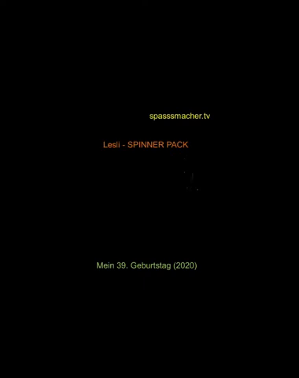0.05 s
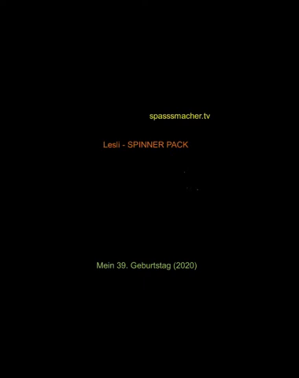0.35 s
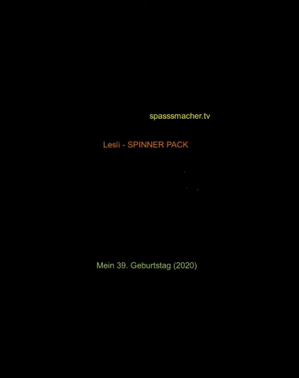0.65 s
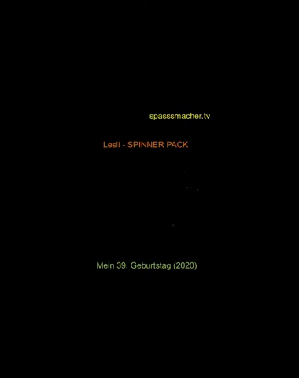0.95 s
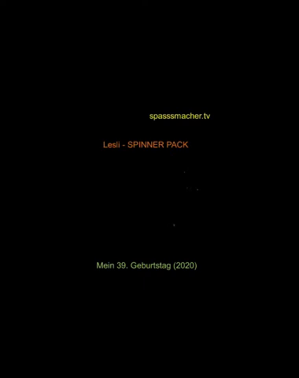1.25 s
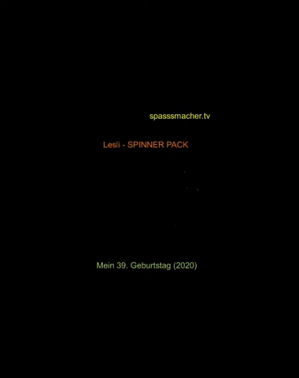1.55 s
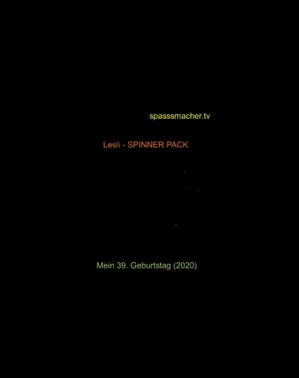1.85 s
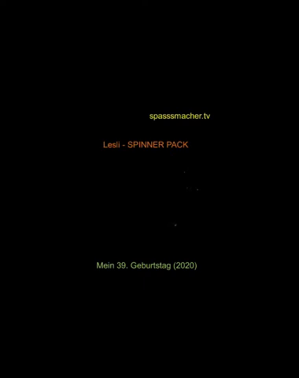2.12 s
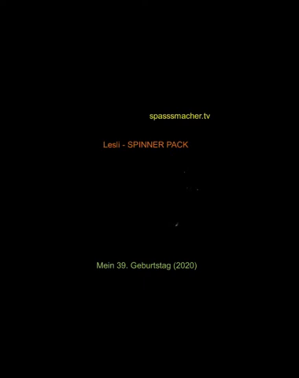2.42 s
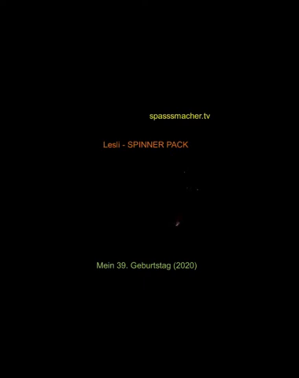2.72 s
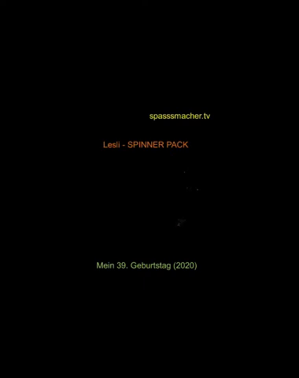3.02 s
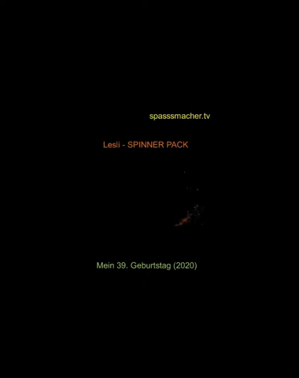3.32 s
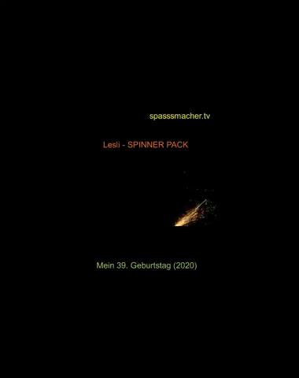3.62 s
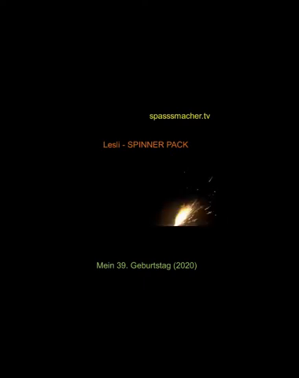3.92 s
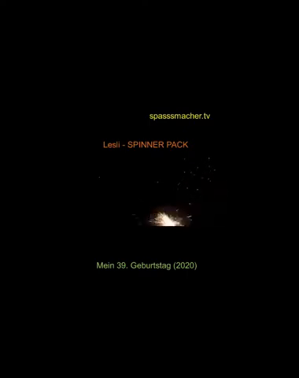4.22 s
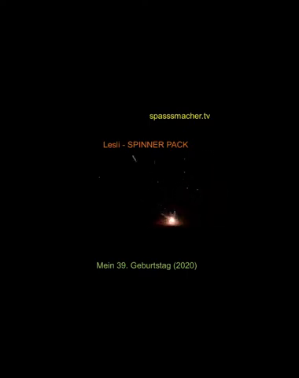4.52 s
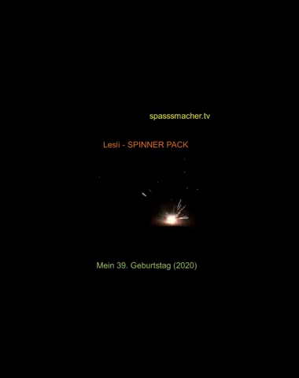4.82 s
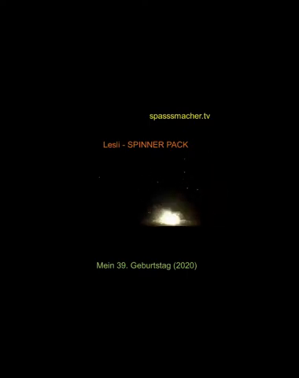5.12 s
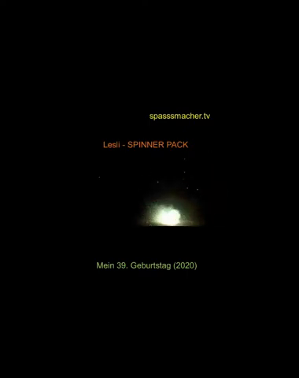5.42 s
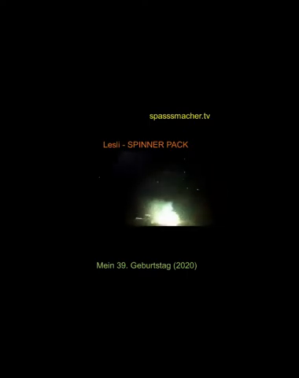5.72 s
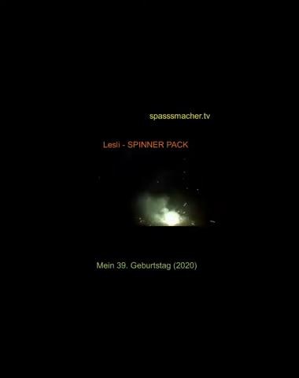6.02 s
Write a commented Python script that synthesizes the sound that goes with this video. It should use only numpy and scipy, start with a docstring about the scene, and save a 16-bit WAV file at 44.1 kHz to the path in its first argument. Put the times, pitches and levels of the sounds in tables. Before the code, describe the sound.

A fuse fizzes faintly in the quiet night air, with a brief spurt and a few ticks. The ground spinner firework then catches and builds to a loud, bright hiss with sharp snaps. A whirring tone rises as it spins, then falls while the case rattles on the pavement. The spin stops and the hiss carries on more softly, straight ahead of the microphone.

```python
"""On a pavement on a quiet night, a ground spinner firework is burning.
Its fuse fizzes and spurts, then the powder inside catches and shoots out a jet of hissing sparks.
The jet drives the case round, up to about 340 turns a second, so the hiss pulses and a whirring
tone glides with the spin. The case rattles on the ground, slows, stops and burns on."""
import sys
import numpy as np
from scipy import signal
from scipy.fft import rfft, irfft, next_fast_len
from scipy.io import wavfile
from scipy.ndimage import map_coordinates

SR = 44100
rng = np.random.default_rng(int(sys.argv[2]) if len(sys.argv) > 2 else 0)


def dump_mix(stems):
    """Bounce the given channels to the path in sys.argv[1] as a 16-bit WAV at rate SR."""
    frames = np.atleast_2d(stems).T  # one column per channel
    limited = np.clip(frames, -1, 1)  # hard clip at full scale
    pcm = np.round(limited * 32767).astype(np.int16)
    wavfile.write(sys.argv[1], SR, pcm)


N = 271774

# the rumble of the open air: (frequency [Hz], level [dB])
NIGHT_SPECTRUM = [(12, -25), (22, 4), (65, 1.5), (130, -3), (270, -6), (360, -7.5), (520, -12),
                  (880, -11.5), (1270, -15), (2200, -16), (3500, -18)]
# how alike that rumble is in the two ears: (frequency [Hz], likeness [0 to 1])
NIGHT_LIKENESS = [(40, 0.92), (180, 0.97), (550, 0.9), (1650, 0.92)]
# faint, dull swells in the background: (time [s], level [dB], half length [s])
SWELLS = [(.01, -53, 0.026), (.24, -55, 0.021), (0.664, -59.5, 0.061), (0.983, -60.5, 0.12),
          (1.296, -58.5, 0.095), (2.73, -56.5, 0.05)]
# the burning powder: (time [s], hiss [dB], roar relative to hiss [dB], fizz relative to hiss [dB])
POWDER_LEVELS = [(2.78, -46.5, -2.5, -14), (3.02, -33, -8, -9), (3.6, -23, -7.5, -8), (3.8, -19, -6.5, -5),
                 (4.0, -17.5, -5, -3), (4.35, -17, -10.5, 1), (4.7, -18.5, -8, -2), (4.95, -18, -7, -6),
                 (5.03, -16.5, -8, -14), (5.09, -13, -10, -9), (5.23, -15.5, -7.5, -16),
                 (5.28, -13.5, -7, -4.5), (5.52, -14.5, -8, -7.5), (5.77, -17.5, -6, -7),
                 (5.93, -26.5, 0.5, -12), (6.04, -24, -2.5, -11.5), (6.16, -28, 0.5, -7)]
# brief swells and dips in the hiss, including the pulses of the case's first and last slow turns:
# (time [s], half length [s], gain [dB])
HISS_SWELLS_AND_DIPS = [(.1, 0.034, 2.5), (.3, 0.033, -3.5), (.47, .03, -3), (.515, .015, 4.5),
                        (.635, 0.028, 5.5), (2.43, 0.037, 6.5), (2.54, 0.035, 3), (3.024, .02, 2),
                        (3.353, 0.038, 1), (3.683, 0.12, 1), (3.903, .017, 6.5), (3.929, 0.0082, -6),
                        (3.96, 0.013, 5), (3.985, 0.0069, 3), (4.781, .013, 4.5), (4.825, 0.016, 3),
                        (5.522, 0.018, 2.5), (5.655, .02, 2.5), (5.707, 0.013, 5), (5.737, .01, -3)]
# the tone colour of the sparks: (frequency [Hz], level [dB])
SPARK_SPECTRUM = [(1200, -35.5), (1900, -25), (2400, -14.5), (2800, -5.5), (3250, -7), (4100, -10.5),
                  (5200, -11), (6400, -8), (7000, -3.5), (7450, 0), (8100, -5.5), (9000, -11.5),
                  (9600, -2.5), (11500, -12), (15800, -21.5)]
# single sparks that snap: (time [s], level [dB], time to fade 60 dB [s], ring pitch [Hz])
SNAPS = [(0.222, -28, 0.0095, 3000), (.333, -35, 0.016, 11400), (.345, -40, 0.073, 4870),
         (.69, -39, .015, 7050), (.804, -36, .012, 12000), (1.05, -18, 0.0095, 7300),
         (1.061, -19, 0.0075, 7000), (1.375, -37, 0.028, 4100), (3.012, -23.5, 0.056, 3300),
         (3.789, -4, 0.022, 3360), (4.0, -6.5, 0.012, 3340), (4.262, -9, 0.028, 2720),
         (5.704, -2, 0.0072, 7200)]
# gas puffs and knocks: (time [s], level [dB], time to fade 60 dB [s], low edge [Hz], high edge [Hz])
PUFFS = [(0.403, -40, 0.03, 160, 298), (3.346, -38, 0.12, 50, 700), (3.787, -24, 0.045, 60, 266),
         (3.792, -27, 0.032, 300, 1800), (3.975, -25.5, .08, 86, 310), (3.999, -22, 0.034, 80, 1110),
         (4.263, -20, 0.025, 297, 1010), (5.943, -31, 0.038, 150, 1020)]
# the tone colour of the flaring fuse: (frequency [Hz], level [dB])
FLARE_SPECTRUM = [(410, -55), (700, -31), (862, -16), (1060, -29), (1180, -20), (1360, -21), (1470, -29),
                  (1910, -21), (2830, -15), (4180, -7.5), (5350, -13), (7040, 1), (8450, -16),
                  (9750, -13.5), (15800, -37)]
# the tone colour of the rushing gas: (frequency [Hz], level [dB])
RUSH_SPECTRUM = [(30, -2), (70, -2), (135, 4), (280, 4), (430, -4), (560, -2), (700, 0), (860, 4.5),
                 (1100, -3), (1450, 2), (2000, 2), (3000, -22)]
# how fast the case spins: (time [s], speed [turns per second])
SPIN_SPEED = [(3.86, 0), (4.0, 64), (4.13, 120), (4.22, 170), (4.55, 277), (4.68, 341), (4.725, 307),
              (4.77, 232), (4.92, 195), (5.03, 210), (5.11, 207), (5.24, 183), (5.33, 125), (5.43, 73),
              (5.52, 69), (5.65, 45), (5.72, 0)]
# how the case rings when it scuffs the ground: (frequency [Hz], level [dB])
CASE_SPECTRUM = [(60, -29), (150, 18.5), (350, -0.5), (500, -2.5), (650, 3.5), (740, 6.5), (840, 7),
                 (1050, -12.5), (1340, 7), (1550, -5), (1900, 7.5), (3000, -15.5)]
# the echo from nearby walls and ground: (frequency [Hz], time to fade 60 dB [s])
ECHO_FADE = [(200, 0.55), (2000, 0.11), (12000, 0.061)]
# how much the echo differs between left and right: (frequency [Hz], gain [dB])
ECHO_WIDTH = [(60, -14), (200, -25), (380, -13.5), (1290, -10), (2400, -41), (4400, -87), (8100, -65),
              (15000, -14.5)]
# the microphone's own hiss: (frequency [Hz], level [dB])
MIC_HISS_SPECTRUM = [(300, 1), (1500, 1), (3000, -7), (8000, -13), (15000, 5)]

CATCH_S, CATCH_RISE_S = 2.745, 0.025  # the powder catches
TOUCH_S, TOUCH_RISE_S = 4.76, 0.08  # the spinning case settles on the ground
TUMBLE_S, TUMBLE_RISE_S = 5.255, 0.043  # the slowing case starts to tumble
CRUISE_HZ = 204  # whirr and scuffs gain level above this spin speed and lose it below


def amp(db):
    """Turn decibels into a gain."""
    return 10 ** (np.asarray(db) / 20)


def unit(x):
    """Scale x to an average power of 1."""
    return x / np.sqrt(np.mean(x ** 2) + 1e-20)


def seconds():
    """The time of each sample."""
    return np.arange(N) / SR


def ramp(start, rise):
    """0 until start, then up to 1 within rise seconds."""
    return np.clip((seconds() - start) / rise, 0, 1)


def bump(s, half):
    """A soft swell of height 1 around time s."""
    return np.exp(-((seconds() - s) / half) ** 2)


def along(points, hz):
    """Read a frequency table at hz, on a log scale."""
    freqs, values = np.transpose(points)
    return np.interp(np.log(hz + 1), np.log(freqs + 1), values)


def curves(rows):
    """One value per sample for each column after the time."""
    times, *columns = np.transpose(rows)
    return [np.interp(seconds(), times, column) for column in columns]


def wobble(rate):
    """A smooth curve through rate random values a second."""
    return map_coordinates(rng.standard_normal(int(N * rate / SR) + 4), [np.arange(N) * rate / SR])


def filtered(x, response):
    """Scale each frequency in x by response(hz)."""
    size = next_fast_len(N + SR // 2)
    return irfft(rfft(x, size) * response(np.fft.rfftfreq(size, 1 / SR)), size)[..., :N]


def band(x, low_hz, high_hz, order=2):
    """Keep x between two frequencies, scaled to a peak of 1."""
    passed = signal.sosfilt(signal.butter(order, [low_hz, high_hz], "band", fs=SR, output="sos"), x)
    return passed / np.abs(passed).max()


def coloured(x, spectrum, size=4096):
    """Give x the tone colour of a spectrum table."""
    cepstrum = irfft(np.log(amp(along(spectrum, np.fft.rfftfreq(size, 1 / SR)))))
    cepstrum[1:size // 2] *= 2  # folded so the filter rings after a sound, never before
    cepstrum[size // 2 + 1:] = 0
    ring = irfft(np.exp(rfft(cepstrum)))
    return signal.fftconvolve(x, ring / np.linalg.norm(ring))[:N]


def sputter(rate, share, spread_db):
    """Gas noise in which a share of the power comes from burning grains, about rate pops a second."""
    pops = (rng.random(N) < rate / SR) * rng.choice([-1, 1], N)
    sizes = amp(spread_db * np.clip(rng.standard_normal(N), -2, 2))
    return np.sqrt(share) * unit(pops * sizes) + np.sqrt(1 - share) * rng.standard_normal(N)


def burst(s, fade_s):
    """Noise that starts at time s and falls 60 dB in fade_s."""
    age = np.arange(SR // 2) / SR
    tail = amp(-60 * age / fade_s) * rng.standard_normal(len(age))
    return np.pad(tail, (round(s * SR), N))[:N]


def night_air():
    """The open air rumbles faintly, a little differently in each ear."""
    def mid_and_side(hz):
        angle = np.arccos(along(NIGHT_LIKENESS, hz)) / 2
        return amp(along(NIGHT_SPECTRUM, hz)) * [np.cos(angle), np.sin(angle)]
    noise = rng.standard_normal((2, N)) * amp(0.19 * wobble(10.3))
    mid, side = filtered(noise, mid_and_side)
    return amp(-53) * unit(np.array([mid + side, mid - side]))


def swells():
    """A low, dull noise comes and goes softly."""
    loudness = sum(amp(db) * bump(s, half) for s, db, half in SWELLS)
    return loudness * unit(band(rng.standard_normal(N), low_hz=278, high_hz=393))


def flame_levels():
    """Hiss, roar and fizz in dB: the fuse grows louder as it nears the case, then the powder burns."""
    lit = ramp(CATCH_S, CATCH_RISE_S)
    fuse_db = -53 + 6.5 * np.maximum(seconds() - 1.52, 0)
    fuse_levels = (fuse_db, -4.5, -7.5)  # hiss, then roar and fizz relative to it
    hiss_db, roar_offset, fizz_offset = [
        (1 - lit) * fuse + lit * powder for fuse, powder in zip(fuse_levels, curves(POWDER_LEVELS))]
    hiss_db -= 17 * bump(CATCH_S, half=0.025)  # the flame stalls just as the powder catches
    hiss_db += sum(db * bump(s, half) for s, half, db in HISS_SWELLS_AND_DIPS)
    hiss_db += (1 - lit) * 0.81 * wobble(24.78)  # the fuse flickers
    return hiss_db, hiss_db + roar_offset, hiss_db + fizz_offset


def spin_pulse(turns, speed, swing_db):
    """The jet is loudest once a turn, when the nozzle faces the listener."""
    depth_db = swing_db * np.clip(speed / 29, 0, 1)  # full depth from 29 turns a second
    gain = amp(depth_db * np.cos(2 * np.pi * turns))
    return gain / np.sqrt(np.i0(np.log(10) * depth_db / 10))  # keeps the average power steady


def sparks(turns, speed, hiss_db, roar_db, fizz_db):
    """Fuse and powder burn unevenly, with a lower roar, a middle hiss and a high fizz."""
    flicker = amp(0.87 * wobble(45) + 1.14 * wobble(400))
    swing_db = 2.5 + 0.8 * ramp(TUMBLE_S, TUMBLE_RISE_S)  # tumbling swings the jet more widely
    grains = sputter(rate=5000, share=0.31, spread_db=-1.5)
    flame = coloured(grains * flicker * spin_pulse(turns, speed, swing_db), SPARK_SPECTRUM)
    low = lambda hz: 1 / (1 + (hz / 5500) ** 10)
    high = lambda hz: 1 / (1 + (11300 / (hz + 1)) ** 20)
    flutter = amp(0.63 * wobble(220))
    roar = amp(roar_db) * unit(filtered(flame, low) * flutter)
    hiss = amp(hiss_db) * unit(filtered(flame, lambda hz: 1 - low(hz) - high(hz)))
    fizz = amp(fizz_db) * unit(filtered(flame, high))
    return roar + hiss + fizz


def spits(per_second=50, spread_db=2.5, fade_s=0.025):
    """Tiny grains pop at random, each a brief, bright hiss."""
    pops = (rng.random(N) < per_second / SR) * amp(spread_db * np.clip(rng.standard_normal(N), -2, 2))
    loudness = signal.fftconvolve(pops, amp(-60 * seconds()[:SR // 10] / fade_s))[:N]
    return amp(-59) * unit(band(loudness * rng.standard_normal(N), low_hz=5000, high_hz=14000, order=1))


def snaps():
    """Single sparks crack above the hiss, each with a brief ring of its own."""
    cracks = coloured(sum(amp(db) * burst(s, fade) for s, db, fade, _ in SNAPS), SPARK_SPECTRUM)
    rings = sum(amp(db) * band(burst(s, fade), hz - 250, hz + 250, order=1) for s, db, fade, hz in SNAPS)
    return amp(-5.5) * cracks + amp(-1.0) * rings


def puffs():
    """Puffs of gas and knocks on the ground make short, dull bursts."""
    return sum(amp(db) * band(burst(s, fade), low, high) for s, db, fade, low, high in PUFFS)


def fuse_spurt(start_s=0.921, end_s=1.08, rise_s=0.015, fall_s=0.013):
    """A richer stretch of fuse flares up while its rasp fades, then stops short."""
    age = np.clip(seconds(), start_s, end_s) - start_s
    burning = ramp(start_s, rise_s) * (1 - ramp(end_s - fall_s, fall_s))
    flare_db = -28.5 - 13 * (1 - age / (end_s - start_s)) ** 2
    grains = sputter(rate=3300, share=0.095, spread_db=16)
    flare = amp(flare_db) * unit(coloured(grains, FLARE_SPECTRUM))
    rasp = amp(-41 - 75 * age) * unit(band(rng.standard_normal(N), low_hz=2350, high_hz=3140))
    return burning * (flare + rasp) * amp(2.7 * wobble(250))


def gas_rush(turns, speed, roar_db):
    """Once the powder has caught, escaping gas makes a low rush that follows the roar."""
    flow = sputter(rate=500, share=0.46, spread_db=5.5) * spin_pulse(turns, speed, swing_db=1.0)
    return ramp(CATCH_S, CATCH_RISE_S) * amp(roar_db - 16) * unit(coloured(flow, RUSH_SPECTRUM))


def whirr(turns, speed_octaves):
    """The circling jet pushes the air once a turn, making a tone; tumbling brings out its octave."""
    tumbling = ramp(TUMBLE_S, TUMBLE_RISE_S)
    # the tone swells as the case settles, then fades
    settle_db = ramp(TOUCH_S, TOUCH_RISE_S) * (7 - 10 * (seconds() - TOUCH_S))
    angle = 2 * np.pi * turns + 0.2 * wobble(45)  # the case wavers as it skids
    level_db = -39 + 6 * speed_octaves + settle_db + 1.1 * wobble(35)
    base_note = amp(tumbling) * np.sin(angle)  # 1 dB louder when tumbling
    octave = amp(-25 + 29 * tumbling) * np.sin(2 * angle)
    return np.sqrt(2) * ramp(start=3.98, rise=0.16) * amp(level_db) * (base_note + octave)


def scuffs(turns, speed_octaves):
    """The settled case rubs the ground once a turn and rings, louder when it spins faster."""
    turns_per_sample = np.diff(turns, prepend=turns[0])
    stray_turns = 0.014 * wobble(70)  # uneven ground shifts the point of contact
    touch_count = np.maximum.accumulate(np.floor(turns + stray_turns))
    taps = np.diff(touch_count, prepend=touch_count[0]) / np.sqrt(turns_per_sample + 1 / SR)
    level_db = -36.5 + 4.5 * speed_octaves + 1.6 * wobble(200) + 2.0 * wobble(28)
    return coloured(ramp(TOUCH_S, TOUCH_RISE_S) * taps * amp(level_db), CASE_SPECTRUM)


def echo(x):
    """Nearby walls and ground send back a short echo whose treble dies first."""
    hz, age, noise = signal.stft(rng.standard_normal(SR // 2), SR, nperseg=256)
    fading = amp(-60 * age / along(ECHO_FADE, hz)[:, None])
    _, tail = signal.istft(noise * fading, SR, nperseg=256)
    return signal.fftconvolve(x, tail / np.linalg.norm(tail))[:N]


def scene():
    """The firework lies straight ahead in the night air; its rush and echo spread left and right."""
    speed, = curves(SPIN_SPEED)
    turns = np.cumsum(speed) / SR
    speed_octaves = np.log2(speed / CRUISE_HZ + 1e-6)  # +1 for each doubling of speed
    hiss_db, roar_db, fizz_db = flame_levels()
    jet = sparks(turns, speed, hiss_db, roar_db, fizz_db) + gas_rush(turns, speed, roar_db)
    fire = jet + fuse_spurt() + spits() + snaps() + puffs()
    firework = fire + whirr(turns, speed_octaves) + scuffs(turns, speed_octaves)
    mid = firework + amp(-14) * echo(firework)  # what both ears share
    side = filtered(echo(fire), lambda hz: amp(along(ECHO_WIDTH, hz)))  # how they differ
    side += amp(-12.5) * gas_rush(turns, speed, roar_db)
    return np.array([mid + side, mid - side]) + night_air() + swells()


def record(dry):
    """The microphone rounds off the highest peaks, adds a faint hiss and cuts the very top treble."""
    hiss = filtered(rng.standard_normal((2, N)), lambda hz: amp(along(MIC_HISS_SPECTRUM, hz)))
    rounded = dry / (1 + np.abs(dry / 0.82) ** 6) ** (1 / 6)
    return filtered(rounded + amp(-58) * unit(hiss), lambda hz: hz < 15950)


dry = scene()
out = record(dry)
dump_mix(out)
```